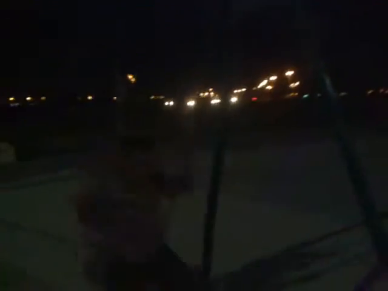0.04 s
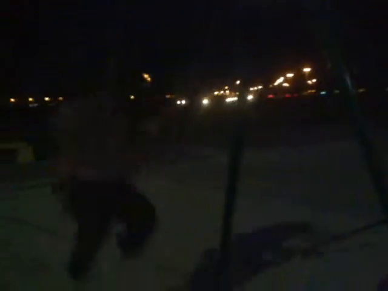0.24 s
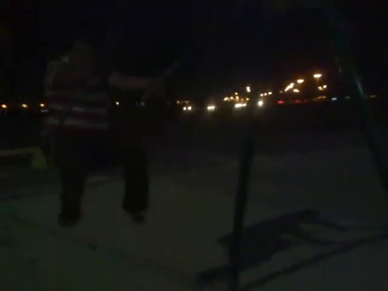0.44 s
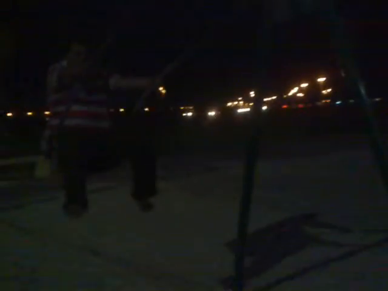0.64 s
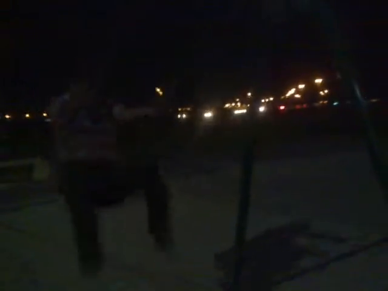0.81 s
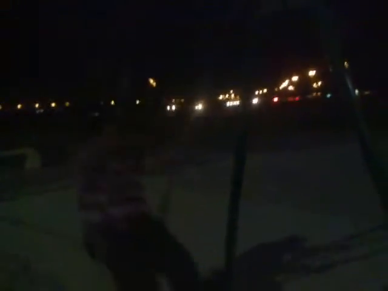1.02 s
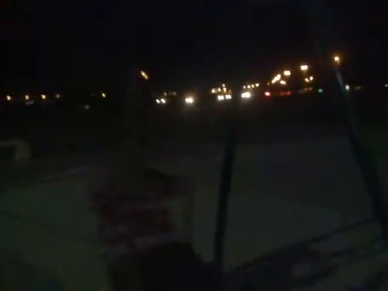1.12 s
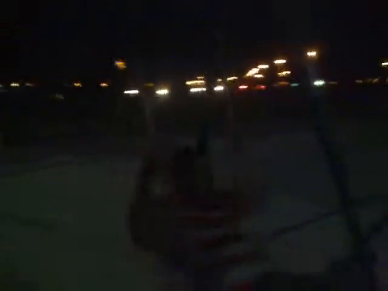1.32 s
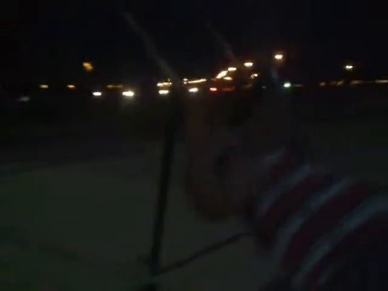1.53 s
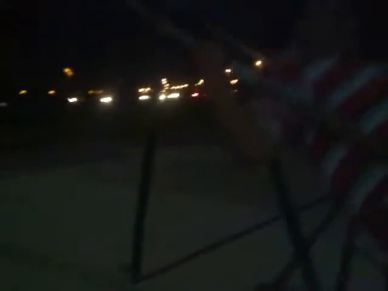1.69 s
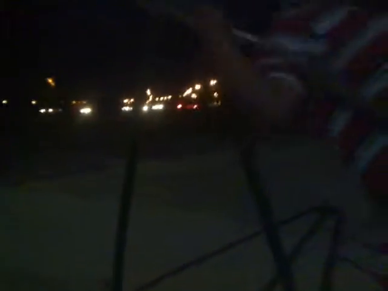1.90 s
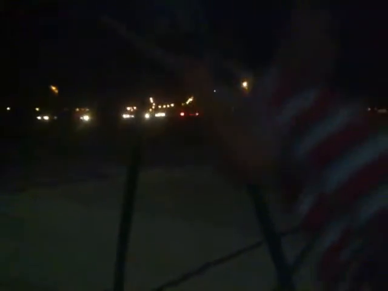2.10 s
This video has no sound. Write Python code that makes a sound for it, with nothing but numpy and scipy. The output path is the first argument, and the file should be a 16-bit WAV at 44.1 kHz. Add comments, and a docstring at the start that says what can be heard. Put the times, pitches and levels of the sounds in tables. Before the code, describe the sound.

A playground swing squeaks loudly on dry metal hooks outdoors at night, with faint insects.

```python
"""Playground swing at night

On each pass the dry steel hooks stick and slip in falling squeals, and the chains ring on after them.
Between the passes two faint low tones sound, the seat knocks and the links clink.
Insects chirp with their wings over the low rumble of a distant road."""
import sys
import numpy as np
from scipy import signal
from scipy.fft import rfft, irfft, next_fast_len
from scipy.io import wavfile
from scipy.ndimage import uniform_filter1d, map_coordinates

SR = 44100
rng = np.random.default_rng(int(sys.argv[2]) if len(sys.argv) > 2 else 0)


def log_audio(samples):
    """Write samples as a 16-bit WAV file to the path given in sys.argv[1]."""
    # one column per channel
    frames = np.atleast_2d(samples).T
    # limit to full scale, then quantise
    limited = np.clip(frames, -1, 1)
    pcm = np.round(limited * 32767).astype(np.int16)
    wavfile.write(sys.argv[1], SR, pcm)


N = 94815
TOP_HZ = 15800


def amp(db):
    """Decibels to gain."""
    return 10 ** (np.asarray(db) / 20)


def along(points, hz):
    """Read a (frequency, value) curve on a log frequency axis."""
    freqs, values = np.transpose(points)
    return np.interp(np.log(hz + 1), np.log(freqs + 1), values)


def clock():
    """The time of each sample in seconds."""
    return np.arange(N) / SR


def curves(rows):
    """Breakpoints to automation: one curve for each column after the time."""
    times, *columns = np.transpose(rows)
    return [np.interp(clock(), times, column) for column in columns]


def lagged(db, seconds):
    """Smooth a level in dB by averaging its amplitude."""
    return 20 * np.log10(np.abs(uniform_filter1d(amp(db), round(seconds * SR))) + 1e-9)


def swell(start, length):
    """Progress 0-1 through a note, and its rounded envelope."""
    progress = np.clip((clock() - start) / length, 0, 1)
    return progress, np.sin(np.pi * progress)


def glide(hz):
    """A sine that follows a pitch curve."""
    return np.sin(2 * np.pi * np.cumsum(hz) / SR)


def filtered(x, response):
    """Shape x with a frequency response."""
    size = next_fast_len(N + SR)
    return irfft(rfft(x, size) * response(np.fft.rfftfreq(size, 1 / SR)), size)[:N]


def noise(spectrum):
    """Coloured noise of rms 1."""
    x = filtered(rng.standard_normal(N), lambda hz: amp(along(spectrum, hz)))
    return x / np.sqrt(np.mean(x ** 2) + 1e-20)


def bursts(hits, spectrum, t60, attack_s):
    """Contact noise with a fast attack and a short decay on each hit."""
    envelope = np.zeros(N)
    for start, db in hits:
        age = np.maximum(clock() - start, 0)
        envelope += amp(db - 60 * age / t60) * (1 - np.exp(-age / attack_s))
    return noise(spectrum) * envelope


# Colour of the night bed (frequency [Hz], relative level [dB])
NIGHT_EQ = [(25, -29), (45, 8), (74, -6.5), (96, 5.5), (115, -6), (240, -10), (500, -30), (1100, -29),
            (2500, -39), (3600, -49.5), (5400, -48.5), (6800, -66.5)]
# Fader ride on the rumble (time [s], level [dB])
ROAD_LEVEL = [(0, -37), (.6, -44.5), (1.55, -41), (2.15, -45.5)]

def distant_road(crossover_hz=1300, hiss_gain_db=-40.5):
    """A far road rumbles, ebbing and swelling under a steady faint hiss."""
    level_db, = curves(ROAD_LEVEL)
    bed = noise(NIGHT_EQ)
    rumble = filtered(bed, lambda hz: 1 / (1 + (hz / crossover_hz) ** 4))
    return amp(level_db) * rumble + amp(hiss_gain_db) * (bed - rumble)


# Insect phrases (time [s], chirps [count], starting pitch [Hz], level [dB])
INSECT_PHRASES = [(0.05, 4, 5520, -62), (0.759, 4, 5640, -59.5), (0.985, 4, 5630, -65.5),
                  (1.21, 4, 5700, -59), (1.428, 4, 5640, -62.5), (1.568, 3, 5150, -69),
                  (1.971, 4, 5580, -61.5)]

def insects(every_s=.0298, chirp_s=.021, fall=.125):
    """Each wing stroke is a short whistle that falls in pitch."""
    out = np.zeros(N)
    for start, count, hz, db in INSECT_PHRASES:
        for k in range(round(count)):
            progress, arch = swell(start + k * every_s, chirp_s)
            out += amp(db + rng.normal(0, 1)) * arch ** 2 * glide(hz * (1 - fall * progress ** 1.5))
    return out


# EQ on a squeal's octave, and on its higher harmonics (frequency [Hz], gain [dB])
OCTAVE_EQ = [(2900, 6), (3250, -14.5), (4200, -1.5)]
OVERTONE_EQ = [(4700, -3), (5800, -12), (6450, -16.5), (7200, -28.5), (7950, -20), (9500, -31),
               (10800, -36), (12000, -39.5), (15500, -43.5)]

def squeal(rows, rough_db, rolloff_db=5.5, subharmonic=0):
    """Steel sticks and slips: returns an unsteady harmonic tone and the envelope of its rasp."""
    fade_s, fast_s, slow_s = .009, .009, .032
    jitter, flutter_db, top_flutter_db = .0056, 1.4, 2.5
    smear_db, rasp_db, grain_db = -23 + rough_db / 2, -30 + rough_db, .5
    t = clock()
    gate = np.clip(np.minimum(t - rows[0][0], rows[-1][0] - t) / fade_s + 1, 0, 1) ** 2
    on, tone, rub = gate > 0, np.zeros(N), np.zeros(N)

    def wobble(per_s):
        """Smooth random modulation."""
        return map_coordinates(rng.standard_normal(N // 32), [t[on] * per_s], mode="wrap")

    pitch, base_db, over_db = (curve[on] for curve in curves(rows))
    phase = 2 * np.pi * np.cumsum(pitch * (1 + jitter * wobble(350))) / SR
    slow_over_db = lagged(over_db, slow_s)
    base_db, over_db = lagged(base_db, fast_s), lagged(over_db, fast_s)
    for k in range(1, 9):
        hz = k * pitch
        if k == 1:
            db = base_db
        elif k == 2:
            db = over_db + along(OCTAVE_EQ, hz)
        else:
            db = slow_over_db + along(OVERTONE_EQ, hz) - rolloff_db * max(k - 4, 0)
        db = db + flutter_db * wobble(120) + (k > 3) * top_flutter_db * wobble(70)
        # uneven slips smear each partial, the higher ones more
        smear = amp(smear_db) * k * np.sqrt(k / 2) * (wobble(420) + 1j * wobble(420))
        partial = np.imag((1 + smear) * np.exp(1j * k * phase))
        tone[on] += np.sqrt(2) * amp(db) * (hz < TOP_HZ) * partial
    tone[on] += subharmonic * amp(base_db) * wobble(250) * np.sin(phase / 2)
    strength_db = lagged(np.maximum(base_db, over_db), slow_s)
    rub[on] = amp(strength_db + rasp_db + grain_db * wobble(300))
    return gate * np.array([tone, rub])


# Squeals of the swing out, the swing back and the next pass
# (time [s], pitch [Hz], fundamental level [dB], overtone level before EQ [dB])
OUT_START = [(.217, 2878, -33, -27), (.225, 2840, -12, -30), (.24, 2849, -32, -27.5),
             (.265, 2734, -36, -45.5), (.31, 2809, -47, -64), (.53, 2815, -51.5, -80)]
OUT_HIGH = [(.237, 2606, -29, -36), (.244, 2643, -18.5, -3.5), (.255, 2510, -25.5, -16),
            (.29, 2401, -16, -10), (.317, 2281, -26, -32.5), (.331, 2261, -44.5, -3),
            (.351, 2290, -27.5, -43.5), (.368, 2187, -17.5, -17), (.39, 2156, -18, -30.5),
            (.413, 2131, -30, -31.5)]
OUT_MID = [(.419, 2292, -27, -42), (.437, 2325, -22, -20.5), (.46, 2250, -21, -37.5),
           (.483, 2243, -55, -18.5), (.5, 2173, -18, -33.5), (.532, 2098, -31.5, -29.5),
           (.553, 2074, -30, -65.5), (.566, 1994, -19, -23.5), (.61, 1991, -29, -48),
           (.685, 1979, -52.5, -71.5)]
OUT_LOW = [(.549, 1600, -19.5, -18), (.56, 1600, -30.5, -20.5), (.59, 1582, -26, -32.5),
           (.615, 1570, -21, -29.5), (.68, 1565, -23.5, -47), (.72, 1563, -32, -79),
           (.765, 1591, -38, -51.5), (.779, 1470, -28.5, -45.5), (.8, 1468, -55.5, -72)]
OUT_TURN = [(.695, 2135, -38.5, -42.5), (.73, 2232, -37, -70), (.775, 2190, -37.5, -63.5),
            (.81, 2119, -44, -60), (.83, 2080, -45.5, -55)]
OUT_STOP = [(.805, 1873, -45.5, -70), (.835, 1873, -47, -67)]
OUT_TAIL = [(.89, 2175, -64, -88.5), (.955, 2169, -59.5, -93.5), (1.11, 2147, -74.5, -100)]
BACK_HIGH = [(1.696, 2935, -34, -24), (1.722, 2936, -23, -35.5), (1.742, 2906, -28.5, -12),
             (1.758, 2876, -21.5, -34.5), (1.778, 2845, -17, -26.5), (1.81, 2727, -55, -65.5),
             (1.9, 2815, -36.5, -71)]
BACK_MID = [(1.773, 2074, -42.5, -45.5), (1.786, 2108, -26.5, -34.5), (1.805, 2087, -26.5, -47.5),
            (1.83, 2077, -48.5, -54.5), (1.91, 2075, -57, -70)]
BACK_LOW = [(1.818, 1570, -33, -43), (1.835, 1535, -20, -37), (1.865, 1492, -25, -37),
            (1.895, 1452, -26, -35), (1.93, 1432, -31, -47), (1.955, 1415, -39, -55),
            (1.97, 1320, -49, -72)]
NEXT_HIGH = [(2.114, 2830, -56, -71), (2.15, 2815, -61.5, -70)]
NEXT_LOW = [(2.12, 1240, -62.5, -88), (2.15, 1571, -42, -64.5)]
# Colour of the friction noise (frequency [Hz], relative level [dB])
RASP_EQ = [(300, -15), (1100, 2.5), (2000, 6), (3400, 0), (6100, -6), (7100, -28), (15000, -40)]

def hooks():
    """Dry hooks rub through two passes and the start of a third: returns their tone and their rasp."""
    tone, rub = (
        squeal(OUT_START, rough_db=-8)
        + squeal(OUT_HIGH, rough_db=-8)
        + squeal(OUT_MID, rough_db=2)
        + squeal(OUT_LOW, rough_db=6.5)
        # where the hook turns, every other slip is weaker
        + squeal(OUT_TURN, rough_db=8.5, rolloff_db=11, subharmonic=amp(-6.5))
        + squeal(OUT_STOP, rough_db=9)
        + squeal(OUT_TAIL, rough_db=4)
        + squeal(BACK_HIGH, rough_db=-5.5)
        + squeal(BACK_MID, rough_db=12)
        + squeal(BACK_LOW, rough_db=1.5, rolloff_db=11)
        + squeal(NEXT_LOW, rough_db=9.5)
        + squeal(NEXT_HIGH, rough_db=11))
    return tone, rub * noise(RASP_EQ)


# Main resonances of the chains (frequency [Hz], gain [dB], t60 [s])
CHAIN_MODES = [(1873, -3, 0.36), (2077, -1.5, 0.33), (2815, 2, 0.7), (3750, -8, .55), (5285, 1, .3)]

def chain_ring(drive):
    """Driven by the hooks, the steel links ring like a bank of narrow resonators."""
    modes = [(hz, amp(db), np.log(1000) / np.pi / t60) for hz, db, t60 in CHAIN_MODES]
    return filtered(drive, lambda f: sum(gain * 1j * f * width / (hz * hz - f * f + 1j * f * width)
                                         for hz, gain, width in modes))


def chain_shimmer(drive, count=90, low_hz=2383, high_hz=13555, t60=.24):
    """No two links are quite alike: together they ring in many scattered high modes."""
    t = np.arange(SR // 2) / SR
    scatter, start_phase = rng.random((count, 2)).T
    hz = low_hz * (high_hz / low_hz) ** ((np.arange(count) + scatter) / count)
    modes = np.sin(2 * np.pi * (np.outer(hz, t) + start_phase[:, None]))
    ring = np.sqrt(hz) @ modes * amp(-60 * t / t60)
    return signal.fftconvolve(drive, ring / np.linalg.norm(ring) / np.sqrt(2))[:N]


# Hook catches (time [s], level [dB])
CATCHES = [(.243, -29), (.562, -29), (1.693, -48)]
# Colour of their scrape (frequency [Hz], relative level [dB])
SCRAPE_EQ = [(1000, -26.5), (3400, -15.5), (5500, 9.5), (7300, -14.5), (15000, -23.5)]

def hook_catches():
    """A hook grabs with a short, bright scrape."""
    return bursts(CATCHES, SCRAPE_EQ, t60=.07, attack_s=.002)


def sum_tone(start_s=.566, length_s=.12, level_db=-40):
    """Two squeals on one hook modulate each other: a tone swells at the sum of their pitches."""
    hz = curves(OUT_LOW)[0] + curves(OUT_MID)[0]
    _, arch = swell(start_s, length_s)
    return amp(level_db) * np.sqrt(2) * arch * glide(hz)


# Soft hoots (time [s], length [s], top pitch [Hz], level [dB])
HOOTS = [(0.975, 0.085, 411, -49), (1.077, 0.1545, 400, -53.5)]

def hoots(sag=.08):
    """Two faint low tones, each arching a little in pitch."""
    out = np.zeros(N)
    for start, length, hz, db in HOOTS:
        _, arch = swell(start, length)
        out += amp(db) * arch * glide(hz * (1 + sag * (arch - 1)))
    return out


# Seat hits (time [s], level [dB])
KNOCKS = [(1.182, -38.5), (1.191, -37.5), (1.576, -39)]
# Body of the seat (frequency [Hz], relative level [dB])
SEAT_EQ = [(120, -4), (400, 9.5), (650, -5.5), (1100, 6), (1500, -17), (8000, -55.5)]

def seat_knocks():
    """The seat knocks dully as the load shifts."""
    return bursts(KNOCKS, SEAT_EQ, t60=.089, attack_s=.00065)


# Link hits (time [s], level [dB])
CLINKS = [(1.22, -43.5), (1.232, -41), (1.29, -42), (1.301, -29.5)]
# Colour of their click (frequency [Hz], relative level [dB])
CLINK_EQ = [(200, 4), (1500, 7), (4000, -7), (6000, -14), (9000, -62)]
# Ring of a struck link (frequency [Hz], gain [dB], t60 [s])
LINK_MODES = [(1420, 3, .05), (1880, -4, .06), (3550, -19, .08)]

def link_clinks(ring_db=-4):
    """Link strikes link as the load shifts: a click with a brief metallic ring."""
    ring = np.zeros(N)
    for start, hit_db in CLINKS:
        age = np.maximum(clock() - start, 0)
        for hz, mode_db, t60 in LINK_MODES:
            peak_db = hit_db + ring_db + mode_db + rng.normal(0, .84)
            ring += amp(peak_db - 60 * age / t60) * np.sin(2 * np.pi * hz * age)
    return ring + bursts(CLINKS, CLINK_EQ, t60=.053, attack_s=.0034)


# Reverb time of the yard (frequency [Hz], t60 [s])
YARD_DECAY = [(1500, 0.22), (10000, 0.15)]

def yard_reverb(x):
    """A short echo from the paving and the surroundings."""
    hz, t, spectra = signal.stft(rng.standard_normal(SR // 2), SR, nperseg=256)
    decay = amp(-60 * t / along(YARD_DECAY, hz)[:, None])
    _, tail = signal.istft(spectra * decay, SR, nperseg=256)
    delayed = np.pad(x, (SR // 200, 0))  # 5 ms pre-delay
    return signal.fftconvolve(delayed, tail / np.linalg.norm(tail))[:N]


def scene():
    """The mix: hooks drive the chains, the swing feeds the reverb, and the night sits behind."""
    tone, rasp = hooks()
    friction = rasp + hook_catches()
    ring = chain_ring(amp(5.5) * tone + amp(18.5) * friction)
    shimmer = chain_shimmer(amp(-13) * tone + amp(-4) * friction)
    swing = tone + sum_tone() + friction + ring + shimmer + link_clinks() + seat_knocks()
    return (swing + amp(-10) * yard_reverb(swing) + hoots() + insects() + distant_road())[None]


def record(dry):
    """A brick-wall low-pass takes off the very top."""
    return np.array([filtered(channel, lambda hz: hz < TOP_HZ) for channel in dry])


dry = scene()
out = record(dry)
log_audio(out)
```